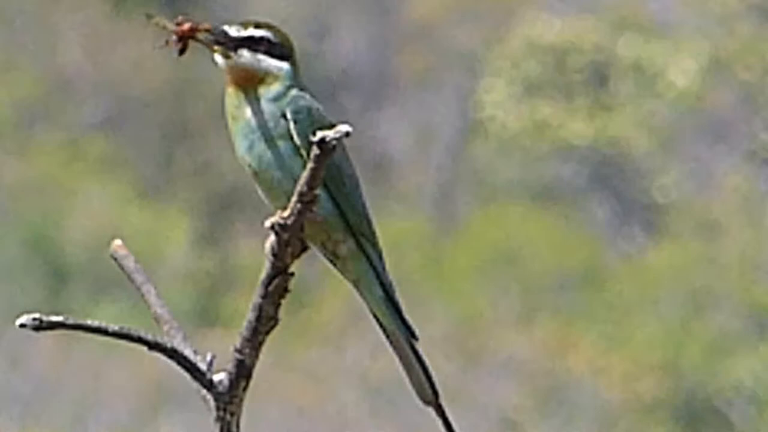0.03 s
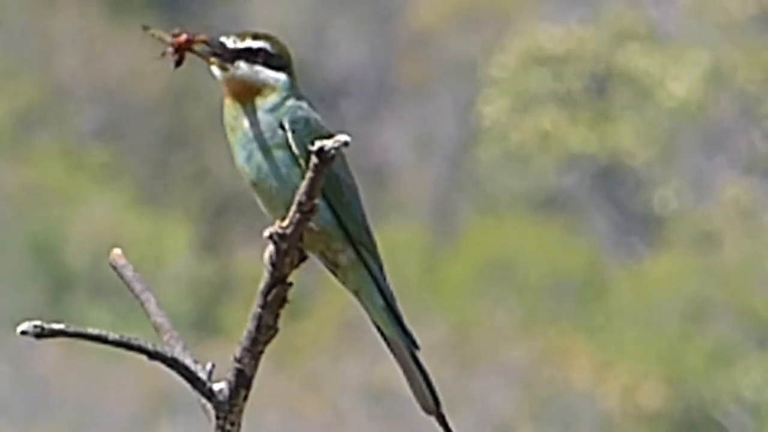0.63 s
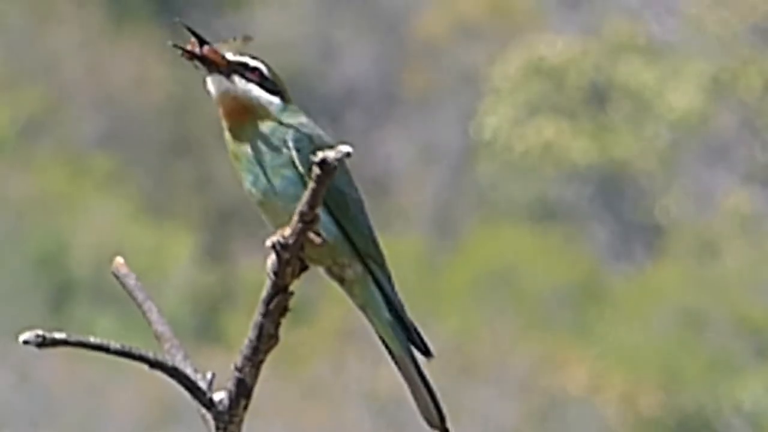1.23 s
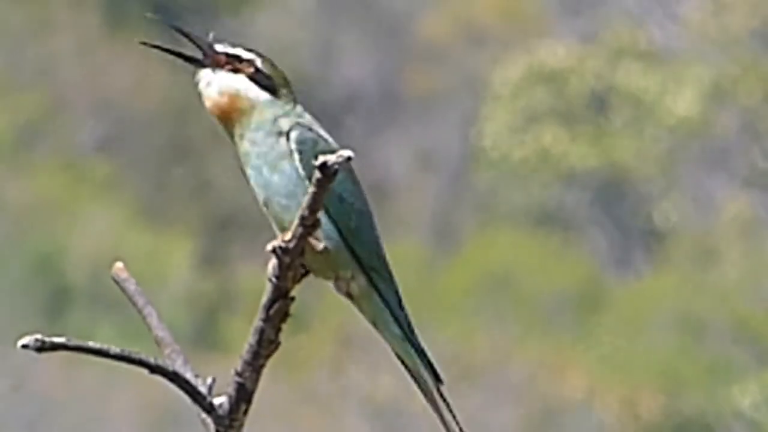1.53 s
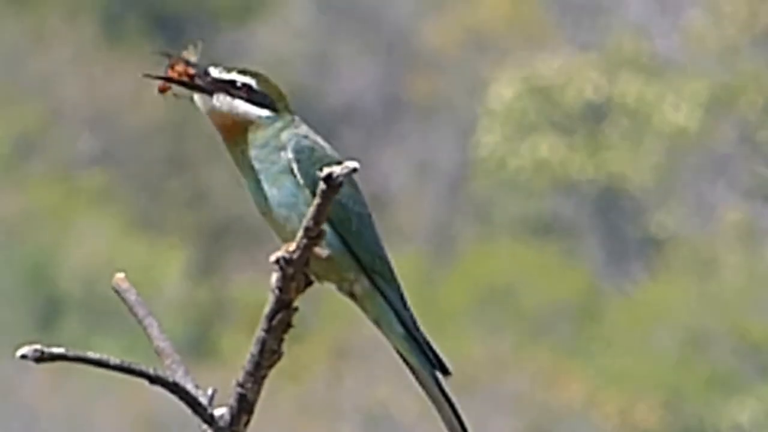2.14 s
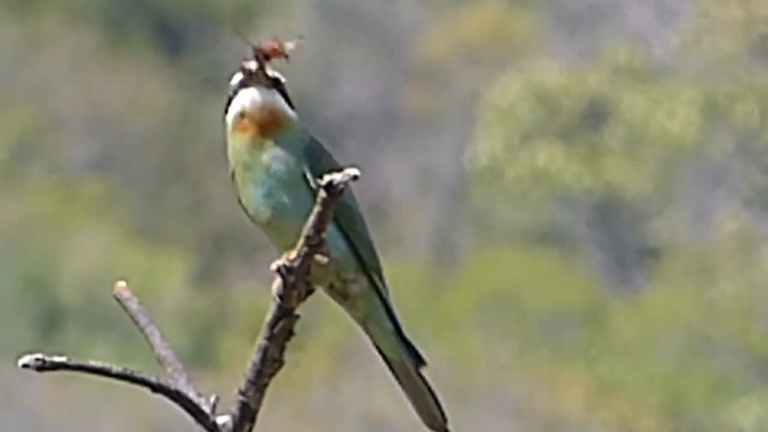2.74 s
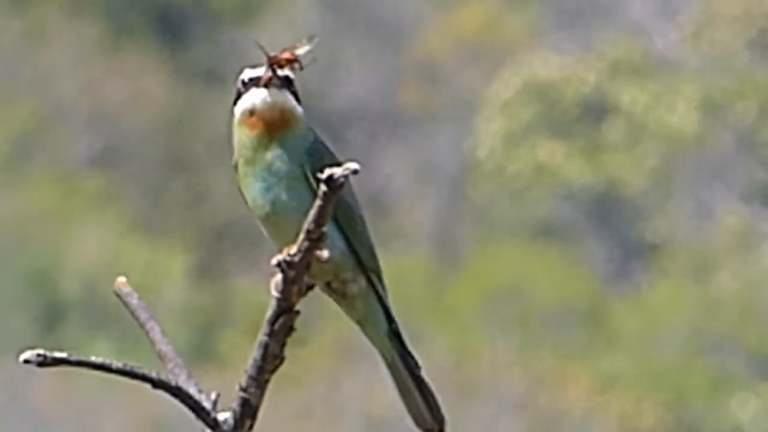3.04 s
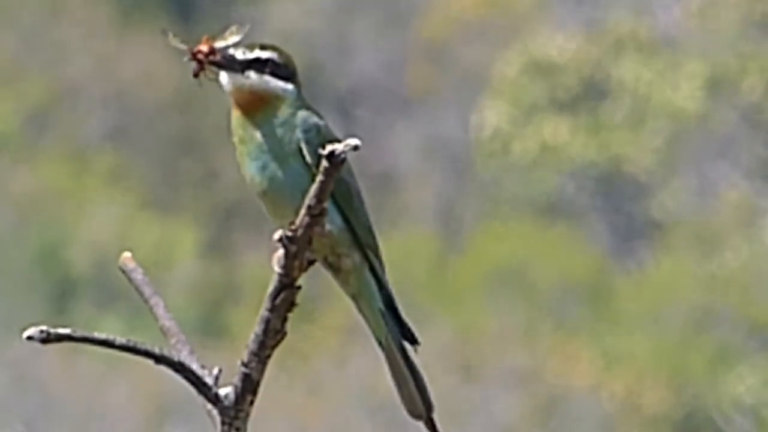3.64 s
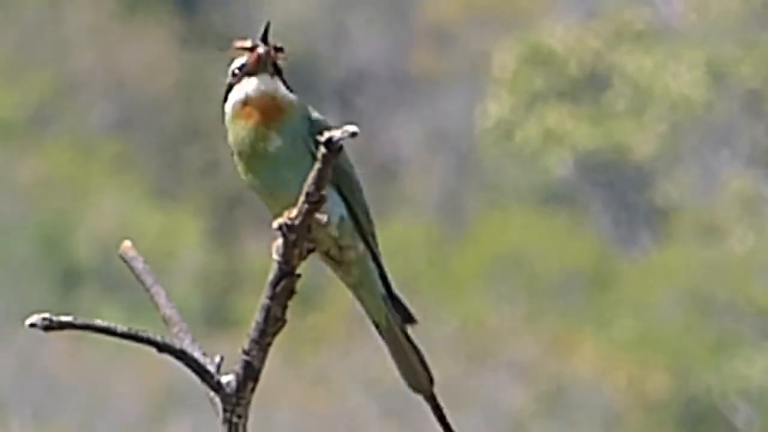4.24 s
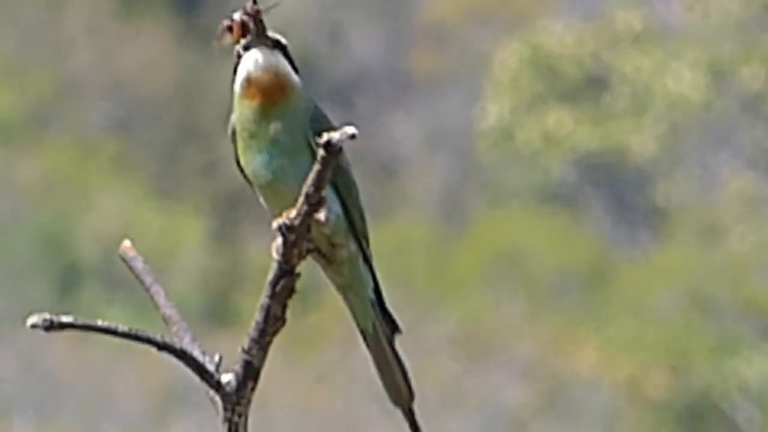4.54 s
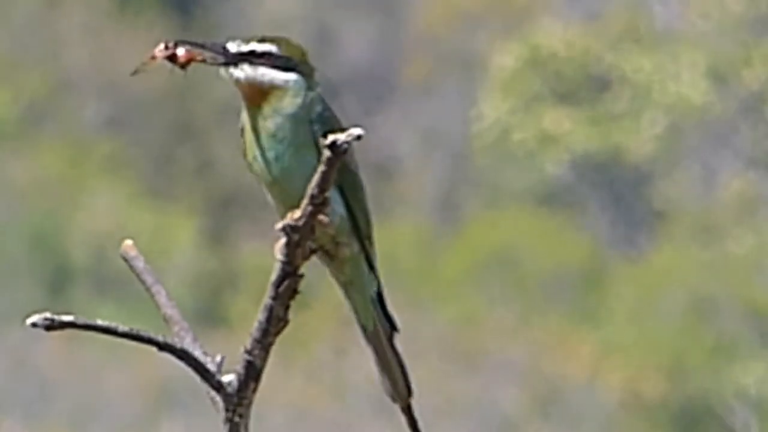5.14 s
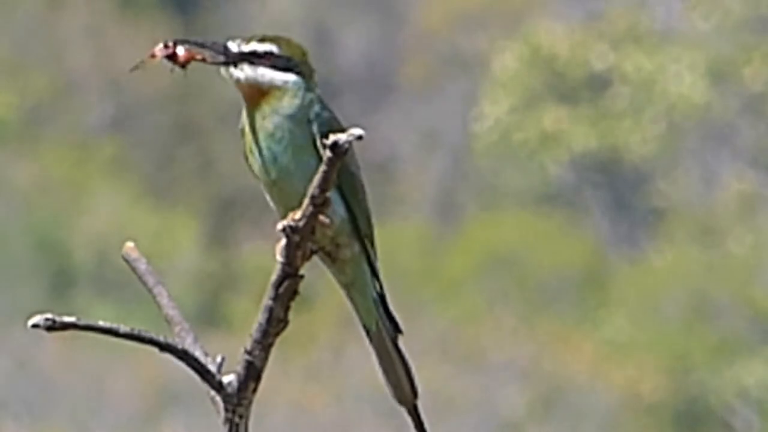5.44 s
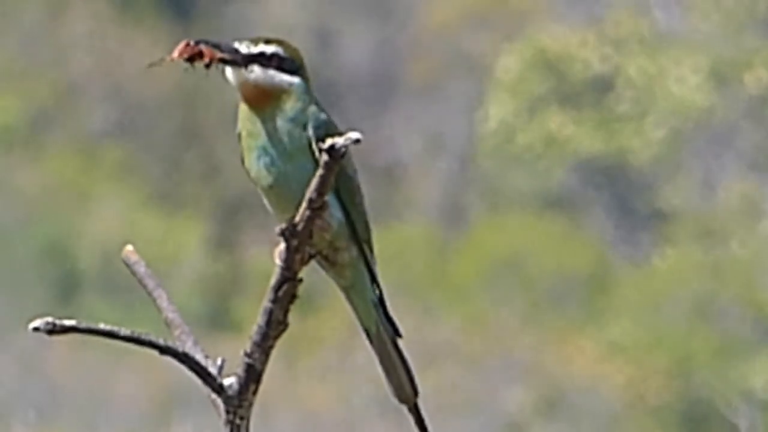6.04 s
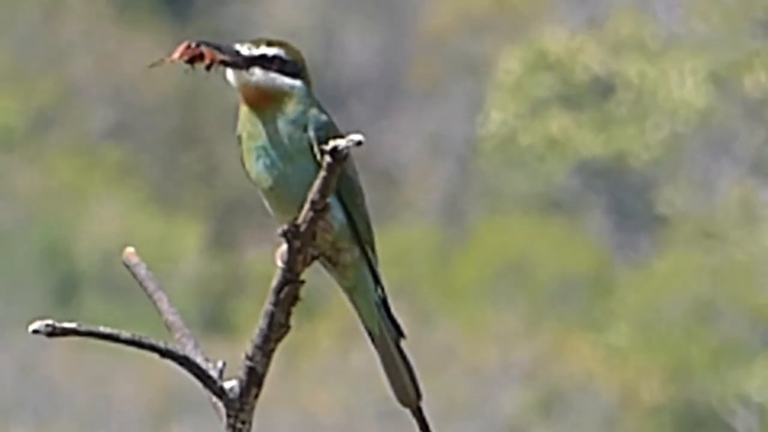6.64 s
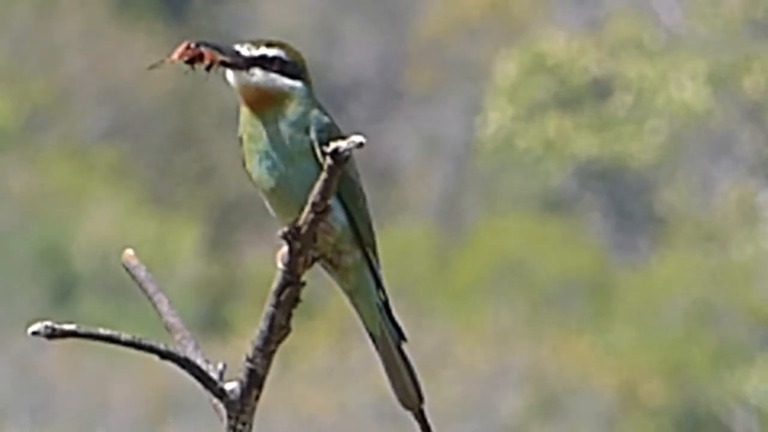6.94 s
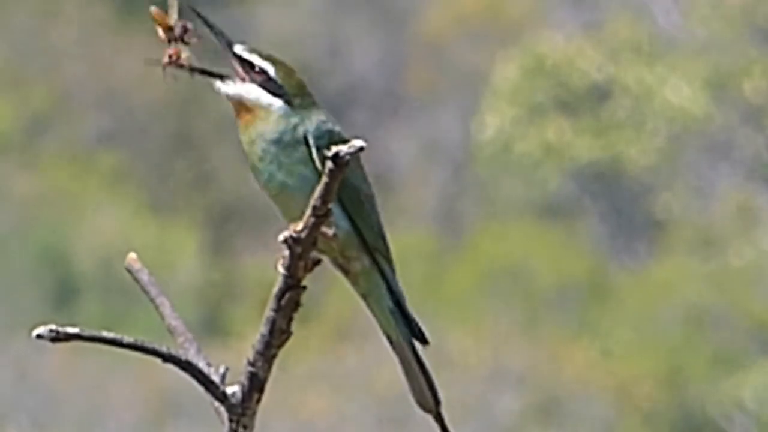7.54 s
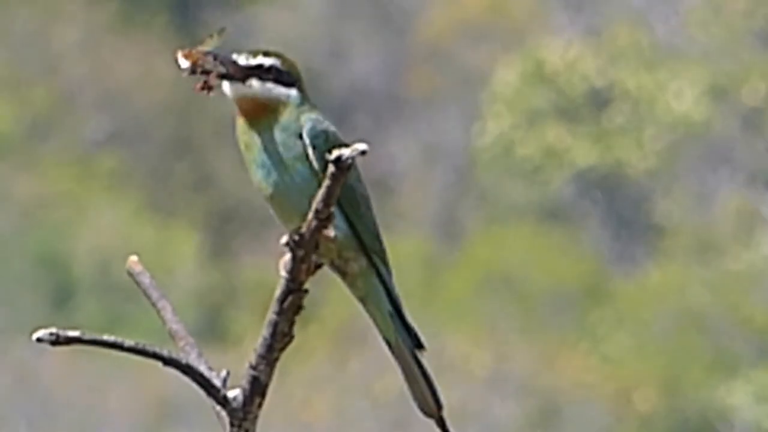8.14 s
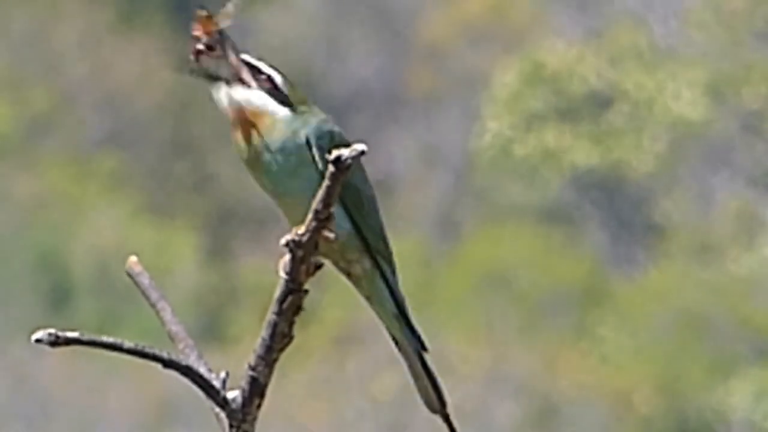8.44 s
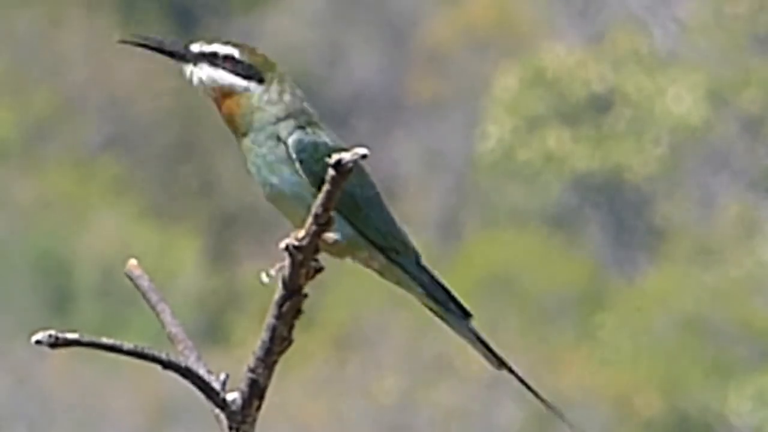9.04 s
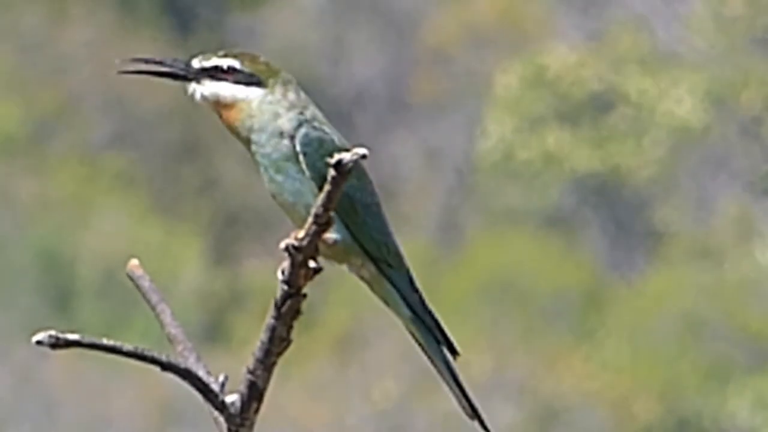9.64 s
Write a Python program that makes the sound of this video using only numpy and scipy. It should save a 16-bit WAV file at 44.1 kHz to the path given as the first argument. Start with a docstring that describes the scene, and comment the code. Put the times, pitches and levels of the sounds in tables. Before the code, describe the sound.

Outdoors in the scrub, a continuous shrill chorus of far cicadas mixes with the fast, high ticking of another insect. Midway a close cicada starts thinly and grows into a bright buzz that swells and dips to the end, with a short high rasp as it builds. Underneath, barely audible, come soft falling bird whistles, scattered dry taps, dull bumps on the microphone and light moving air.

```python
"""Hot scrubland, microphone in the open. From the start far cicadas hiss, their tymbal clicks merging, and a
higher insect clicks out quick syllables above them. Far lower in level come soft bumps at the microphone, dry
knocks and a distant bird's falling notes, over a faint background rush and low rumble. From 4.2 s a near cicada
winds up, its buckling ribs ringing its hollow abdomen; at 5 s another high insect rasps briefly. By 5.8 s the
near one holds a surging buzz, later topped by a sizzle. A small scrape comes near the end."""
import sys
import numpy as np
from scipy import signal
from scipy.fft import rfft, irfft
from scipy.io import wavfile
from scipy.ndimage import uniform_filter1d, map_coordinates

SR = 44100
rng = np.random.default_rng(int(sys.argv[2]) if len(sys.argv) > 2 else 0)


def int16_out(signal):
    """Quantize to a 16-bit WAV file."""
    q = np.round(np.clip(np.atleast_2d(signal).T, -1, 1) * 32767)
    wavfile.write(sys.argv[1], SR, q.astype(np.int16))


N = 435708
TIME = np.arange(N) / SR
HZ = np.maximum(np.fft.rfftfreq(N, 1 / SR), 1)

# tymbal cycle rate in full song: t/s, f/Hz
CICADA_RATE = [(5.9, 164.3), (6.54, 164.4), (7.17, 163.8), (7.47, 162.8), (9.88, 163.7)]
# relative strength of each rib, in buckling order
CICADA_RIBS = [0.62, 1.0, 0.93, 0.71]
# resonances of abdomen and tymbal: f/Hz, width/Hz, level/dB
ABDOMEN = [(4020, 350, 0.45), (4630, 480, 2.5), (5170, 530, 1.5), (6010, 260, -5), (6610, 240, -18.5),
           (7500, 240, -16), (9400, 1600, -16)]
CICADA_START_S, INTO_SONG_S = 4.19, (5.3, 5.8)   # entry; span in which wind-up turns into full song

def near_cicada(slow_start_hz=13.1, speed_up_s=.57, rib_step=.2471, jitter=.00028, stumble=.00499,
                waver_db=1.5, stutter_db=2.0):
    """Close by: four tymbal ribs buckle in turn each cycle, and every click rings the hollow abdomen."""
    rate, = in_time(CICADA_RATE)
    until_song_s = np.maximum(INTO_SONG_S[1] - TIME, 0)
    rate = rate - slow_start_hz * (1 - np.exp(-(until_song_s / speed_up_s) ** 2))
    full_rate = np.median(rate[TIME > INTO_SONG_S[1]])
    winding = np.interp(TIME, INTO_SONG_S, [1, 0])
    level_db, brightness = cicada_effort(winding)
    # winding up, the muscle stumbles and the ribs click evenly; in full song they bunch slightly
    cycle = np.cumsum(full_rate * (1 + (jitter + stumble * winding) * drift(39.5))) / SR
    step = rib_step + winding * (1 / len(CICADA_RIBS) - rib_step)
    clicks = 0
    for rib, strength in enumerate(CICADA_RIBS):
        samples_off = ((cycle - rib * step + .5) % 1 - .5) * SR / full_rate
        clicks += strength * np.sinc(samples_off) * (np.abs(samples_off) < 8)
    clicks *= 1 + .04 * drift(300)
    song = 0
    for k, (hz, width, db) in enumerate(ABDOMEN):
        tilt_db = brightness * min(hz / 1000 - 5, 1)   # pivots at 5 kHz, flat above 6 kHz
        # moving air makes each resonance swell and fade on its own
        song += (-1) ** k * from_db(db + tilt_db + waver_db * drift(6)) * resonate(clicks, hz, width)
    # a slack body runs slow: clicks and resonances glide together
    position = np.cumsum(rate / full_rate)
    song = map_coordinates(song, [position - position[-1] + N - 1], order=5, mode="mirror")
    song = bandpass(song, 3650, 10800, order=12)
    song /= np.sqrt(uniform_filter1d(song ** 2, size=4000))   # evens out the level
    fade_in = np.clip((TIME - CICADA_START_S) / .2, 0, 1)
    stutter = from_db(stutter_db * winding * (drift(16) - .5))
    return scrub(swell_partials(song) * from_db(level_db) * fade_in * stutter, t60=.087, wet_db=-15.5)


# surges of the near song: top t/s, length/s, extra level/dB, extra brightness/(dB/kHz)
SURGES = [(5.1, .5, 2.5, -1.2), (5.56, .24, -4, 0.5), (5.925, 0.24, 3, -0.5), (6.193, 0.25, 0.9, -6.5),
          (6.624, 0.49, 5.5, -4), (7.0, .2, 1.5, 3.5), (7.35, .15, -1, 1), (7.65, 0.61, 3, -0.5),
          (8.146, 0.3, 3.5, 1.5), (8.486, 0.43, 5, 2), (9.05, 0.33, -0.3, 0), (9.72, 0.71, 4.5, 1)]

def cicada_effort(winding, song_db=-34.5, faint_db=-12.5, grow_s=.56, thin_tilt=4.5, song_tilt=1.55):
    """Level/dB and brightness/(dB/kHz) of the near cicada: a thin, growing entry, then surges."""
    level_db = song_db + faint_db * np.exp(-np.maximum(TIME - CICADA_START_S, 0) / grow_s)
    brightness = song_tilt + winding * (thin_tilt - song_tilt)
    for s, length_s, db, brighter in SURGES:
        surge = swell(s, length_s)
        level_db += db * surge
        brightness += brighter * surge
    return level_db, brightness


# swells and dips of single partials: top t/s, length/s, f/Hz, extra level/dB
PARTIAL_SWELLS = [(6.08, 0.26, 4105, 4.5), (6.18, .15, 5260, -10), (6.6, 1.1, 5420, -7),
                  (6.65, .35, 4770, 4), (6.75, .5, 5940, 4.5), (6.92, .25, 5250, 3.5), (7.08, .25, 4095, 5),
                  (7.304, 0.14, 5225, 6.5), (7.55, .6, 5920, -3.5), (7.5, .18, 4560, 4),
                  (7.78, 0.59, 5375, 6.5), (7.8, .6, 6515, 6), (7.86, .2, 5210, -9),
                  (8.05, 0.39, 4565, 4.5), (8.42, .3, 5220, 5), (8.9, .35, 4620, -9), (8.94, .25, 4085, 8),
                  (8.95, .7, 3900, -3.5), (9.4, .6, 5250, 4), (9.55, 0.89, 4090, 5)]

def swell_partials(song, reach_hz=115):
    """One partial after another stands out of the near buzz or sinks back into it."""
    spectrum, out = rfft(song), song
    for s, length_s, hz, db in PARTIAL_SWELLS:
        band = np.exp(-np.minimum(((HZ - hz) / reach_hz) ** 2, 20))
        partial = irfft(spectrum * band, N)
        out = out + (from_db(db * swell(s, length_s)) - 1) * partial
    return out


# late rise of the sizzle: t/s, level/dB
SIZZLE_LEVEL = [(5.5, -78), (7.1, -62), (7.6, -54), (8.8, -57), (9.7, -52)]
# its spectrum: f/Hz, level/dB
SIZZLE_SPECTRUM = [(8000, -100), (11000, -25), (12400, -2), (13000, -4), (13450, -1), (13800, -15),
                   (14250, -16), (14700, -35)]

def sizzle(flutter_db=1.5):
    """The very top of the near cicada's song: its clicks smear into a fine sizzle."""
    level_db, = in_time(SIZZLE_LEVEL)
    return from_db(level_db + flutter_db * drift(8)) * spread(swarm(12000), SIZZLE_SPECTRUM)


# far chorus at the microphone: t/s, level/dB
CHORUS_LEVEL = [(0, -32), (1.2, -31.8), (2.1, -31), (3.2, -32.5), (4.8, -32), (7, -32.5), (9.88, -32)]
# its spectrum: f/Hz, level/dB
CHORUS_SPECTRUM = [(2500, -49), (3050, -38), (3300, -19), (3620, -13), (3880, -5), (4130, 1.5),
                   (4450, -1.5), (4950, -0.5), (5600, -10.5), (6300, -16.5), (7100, -23.5), (9400, -41),
                   (15000, -100)]

def far_chorus(flutter_db=.3):
    """Cicadas far out in the scrub: their clicks merge into one restless band of hiss."""
    level_db, = in_time(CHORUS_LEVEL)
    gain = from_db(level_db + flutter_db * drift(25))
    return gain * spread(patchy(swarm(30000), depth_db=1.03), CHORUS_SPECTRUM)


# swells of the high pulsing insect: top t/s, extra level/dB
SHRILL_SWELLS = [(.85, 2), (2.2, 2.5), (6.0, 2.5), (9.75, 3)]
# its spectrum: f/Hz, level/dB
SHRILL_SPECTRUM = [(6800, -47), (8000, -8.5), (8800, -1.5), (9620, -1.5), (9760, -8), (10000, 0),
                   (10225, 4.5), (10370, 0), (10600, -0.5), (11200, -10.5), (12200, -28), (14100, -53)]

def shrill_insect(usual_db=-34.5, wander_db=.6, syllables_per_s=22.6, cycles_per_syllable=9,
                  tempo_wander=.006, pause_depth=.69, pause_share=.25, smear=.7):
    """High tymbal clicks, partly smeared by the bushes, cut into syllables by brief pauses."""
    swells_db = sum(db * swell(s, length_s=.3) for s, db in SHRILL_SWELLS)
    level_db = usual_db + wander_db * drift(8.2) + swells_db
    syllable = np.cumsum(syllables_per_s * (1 + tempo_wander * drift(2))) / SR
    from_pause = 2 * ((syllable - .11) % 1) - 1   # zero just after the middle of each syllable
    gate = 1 - pause_depth / (1 + np.abs(from_pause / pause_share) ** 4.6)
    clicks = rms_one(high_tymbal(syllable * cycles_per_syllable) + smear * rng.standard_normal(N))
    return from_db(level_db) * rms_one(gate) * spread(patchy(clicks, depth_db=1.0), SHRILL_SPECTRUM)


# spectrum of the second high insect: f/Hz, level/dB
RASP_SPECTRUM = [(7400, -42), (8000, -5), (8350, 0.5), (8800, -12), (9300, 1), (9800, -5), (10300, -19),
                 (11600, -11), (12400, -33), (15000, -70)]

def rasping_insect(start_s=5.01, attack_s=.27, hold_s=.71, release_s=.4, level_db=-30.5,
                   sag_db_per_s=7.5, cycle_hz=212, tempo_wander=.025, smear=.55):
    """Another high insect joins with one short, unbroken run of tymbal clicks that sags in level."""
    age = np.maximum(TIME - start_s, 0)
    envelope = np.interp(age, np.cumsum([0, attack_s, hold_s, release_s]), [0, 1, 1, 0])
    cycle = np.cumsum(cycle_hz * (1 + tempo_wander * drift(20))) / SR
    clicks = rms_one(high_tymbal(cycle) + smear * rng.standard_normal(N))
    return envelope * from_db(level_db - sag_db_per_s * age) * spread(clicks, RASP_SPECTRUM)


# relative strength of each rib of the two high insects, in buckling order
HIGH_RIBS = [1, 1, 0.82, 0.59]

def high_tymbal(cycle, scatter_s=.00007, uneven_db=1.2):
    """The ribs buckle in turn in every cycle, each click a little off in time and strength."""
    due = np.flatnonzero(np.diff(np.floor(cycle * len(HIGH_RIBS))) > 0)
    late, strong = rng.standard_normal((2, N))[:, due]
    at = np.clip(due + np.round(late * scatter_s * SR).astype(int), 0, N - 1)
    clicks = np.zeros(N)
    clicks[at] = np.resize(HIGH_RIBS, len(due)) * from_db(uneven_db * strong)
    return rms_one(clicks)


# spectrum of the far high insects: f/Hz, level/dB
HAZE_SPECTRUM = [(5500, -49), (7100, -19), (7600, -7.5), (7950, 0.5), (9000, -3), (10500, -1.5),
                 (11650, -8.5), (11950, -16), (13500, -27.5), (14100, -46)]

def insect_haze(level_db=-36.5):
    """High insects far from the microphone merge into an even hiss."""
    return from_db(level_db) * spread(rng.standard_normal(N), HAZE_SPECTRUM)


# the bird's notes: t/s, top f/Hz, relative level/dB
BIRD_NOTES = [(1.21, 1080, -49), (1.446, 1105, -51), (1.71, 1130, -44), (1.974, 1030, -47),
              (4.725, 1095, -54), (4.945, 1070, -53), (7.62, 1118, -48.5), (7.862, 1085, -45),
              (8.124, 1100, -41.5), (9.125, 1012, -51), (9.345, 1097, -53.5), (9.565, 1120, -52)]

def distant_bird(length_s=.082, fall=.8, crest=.274, rough=.29, hoarse=.017, gain_db=-2.0):
    """Soft, hoarse whistles from across the scrub arch over their top pitch, then drop."""
    notes, length = np.zeros(N), int(length_s * SR)
    progress = np.arange(length) / length
    envelope = np.sin(np.pi * progress ** .76)
    quaver = 1 + hoarse * drift(120)
    for s, hz, db in BIRD_NOTES:
        span = slice(int(s * SR), int(s * SR) + length)
        pitch = hz * (1 - fall * (progress - crest) ** 2) * quaver[span]
        notes[span] += from_db(db + gain_db) * envelope * np.sin(2 * np.pi * np.cumsum(pitch) / SR)
    return scrub(notes * (1 + rough * drift(150)), t60=.99, wet_db=-2.5)


# dry knocks: t/s, relative level/dB, lowest f/Hz, highest f/Hz, t60/s
KNOCKS = [(1.114, -36.5, 1300, 2150, .028), (1.762, -42.5, 150, 1000, 0.044),
          (2.126, -44.5, 1500, 2300, 0.081), (2.86, -41, 1600, 3300, .035), (3.565, -47, 2820, 3220, 0.13),
          (5.451, -32.5, 250, 1900, 0.026), (9.29, -49, 2110, 2620, 0.079)]

def knocks(gain_db=1.0):
    """Short dry taps among the bushes, each filling its own band; the first, just before the bird's first note,
    is a snap of its beak."""
    taps = 0
    for s, db, low_hz, high_hz, t60 in KNOCKS:
        tap = bandpass(burst(s, t60) + 1e-18, low_hz, high_hz, order=4)
        taps += from_db(db + gain_db) * tap / np.abs(tap).max()
    return scrub(taps, t60=.12, wet_db=-8)


# spectrum of the scrape: f/Hz, level/dB
SCRAPE_SPECTRUM = [(200, -25), (420, -2.5), (1000, -12), (1500, 1), (2050, 0), (2800, -7), (4500, -55)]

def scrape(top_s=9.647, length_s=.04, level_db=-48.5):
    """A short rub of dry grains that swells and fades."""
    return from_db(level_db) * swell(top_s, length_s) * spread(swarm(3000), SCRAPE_SPECTRUM)


# soft bumps at the microphone: t/s, relative level/dB
BUMPS = [(0.229, -49.5), (0.519, -52), (1.763, -54), (3.718, -54), (4.363, -55), (4.449, -49), (5.287, -45),
         (5.377, -51), (5.449, -45), (5.529, -53), (5.69, -52), (7.124, -55), (7.453, -54)]

def microphone_bumps(body_hz=150, width_hz=120, gain_db=1.5, rub_db=-81, rub_swing_db=5, side_db=-6):
    """Dull thuds right at the microphone, faint uneven rubbing between; partly unlike left and right."""
    def handling():
        push = sum(from_db(db + gain_db) * burst(s, t60=.25) for s, db in BUMPS)
        body = resonate(push, body_hz, width_hz)
        thuds = resonate(body, body_hz, 2 * width_hz) * np.sqrt(SR / width_hz) / 4
        rubbing = resonate(resonate(rng.standard_normal(N), hz=197, width=64), hz=197, width=64)
        return thuds + from_db(rub_db) * rms_one(rubbing * from_db(rub_swing_db * drift(5.4)))
    mid, side = handling(), from_db(side_db) * handling()
    return np.array([mid + side, mid - side])


# spectrum of the faint background rush and low rumble: f/Hz, level/dB
RUSH_SPECTRUM = [(12, -7.5), (22, -4), (32, -18), (56, -25.5), (125, -51), (190, -19), (269, -17),
                 (400, -15.5), (464, -9.5), (600, -15), (960, -7.5), (1150, -20), (1400, -13.5),
                 (2600, -19.5), (3100, -21.5), (6600, -100)]

def background_rush(level_db=-57, sway_db=1.55):
    """Faint background rush and low rumble."""
    return from_db(level_db + sway_db * drift(6.4)) * spread(rng.standard_normal(N), RUSH_SPECTRUM)


def patchy(x, depth_db, band_hz=130, count=14):
    """Moving air lets narrow bands of a far sound swell and fade, in `count` interleaved sets."""
    spectrum, out = rfft(x), 0
    for k in range(count):
        bands_off = np.abs((HZ / band_hz - k + count / 2) % count - count / 2)
        bands = irfft(spectrum * np.maximum(1 - bands_off, 0), N)
        out += bands * from_db(depth_db * drift(3.6))
    return out


def scrub(x, t60, wet_db):
    """Direct sound plus scatter from the bushes, different on each side of the microphone."""
    tails = rng.standard_normal((2, SR)) * from_db(-60 * TIME[:SR] / t60)
    tails /= np.sqrt(np.sum(tails ** 2, axis=1, keepdims=True))
    return x + from_db(wet_db) * signal.fftconvolve([x], tails, axes=1)[:, :N]


# stereo width at the microphone: f/Hz, side minus mid level/dB
STEREO_WIDTH = [(30, -2), (120, -8), (350, -5.5), (700, -4.5), (1300, -15), (2500, -12), (4200, -19),
                (8000, -13.5), (10500, -15), (13000, -12)]

def spread(excitation, spectrum):
    """Colour a source and surround it with its own diffuse scatter; stereo, rms 1."""
    colour = gain_at(spectrum)
    mid = irfft(rfft(excitation) * colour, N)
    side = irfft(rfft(rng.standard_normal(N)) * colour * gain_at(STEREO_WIDTH), N)
    return rms_one(np.array([mid + side, mid - side]))


def swarm(clicks_per_s):
    """Countless unrelated tiny clicks."""
    return rms_one((rng.random(N) < clicks_per_s / SR) * rng.standard_normal(N))


def burst(s, t60):
    """Noise that starts at s and dies away."""
    out, start = np.zeros(N + SR), int(s * SR)
    out[start:start + SR] = rng.standard_normal(SR) * from_db(-60 * np.minimum(TIME[:SR] / t60, 2))
    return out[:N]


def swell(s, length_s):
    """A smooth rise and fall around s, above half its height for length_s."""
    return np.exp2(-np.minimum((2 * (TIME - s) / length_s) ** 2, 20))


def drift(rate_hz):
    """Random wander, mostly slower than rate_hz; rms 1."""
    return rms_one(irfft(rfft(rng.standard_normal(N)) / (1 + (HZ / rate_hz) ** 2), N))


def resonate(x, hz, width):
    """One resonance, gain 1 on top."""
    r = np.exp(-np.pi * width / SR)
    feedback = [1, -2 * r * np.cos(2 * np.pi * hz / SR), r * r]
    return signal.lfilter(np.array([1, 0, -1]) * (1 - r * r) / 2, feedback, x + 1e-18)


def bandpass(x, low_hz, high_hz, order):
    """Keep one band."""
    return signal.sosfilt(signal.butter(order, [low_hz, high_hz], "band", fs=SR, output="sos"), x)


def gain_at(points):
    """Gain of an f/Hz, level/dB table at every frequency."""
    hz, db = np.transpose(points)
    return from_db(np.interp(np.log(HZ), np.log(hz), db))


def in_time(rows):
    """Each column of a curve at every sample."""
    s, *columns = np.transpose(rows)
    return [np.interp(TIME, s, c) for c in columns]


def from_db(db):
    """Decibels to gain."""
    return 10 ** (np.asarray(db) / 20)


def rms_one(x):
    """Scale to rms 1."""
    return x / np.sqrt(np.mean(x ** 2) + 1e-20)


def scene():
    """All sources at the microphone."""
    insects = far_chorus() + insect_haze() + shrill_insect() + rasping_insect() + near_cicada() + sizzle()
    return insects + distant_bird() + knocks() + scrape() + microphone_bumps() + background_rush()


def record(dry, start_s=.072, offset=-.0031, cutoff_hz=14700):
    """The sound switches on after a moment, sits on a small offset and loses its top."""
    lowpass = signal.ellip(10, .1, 80, cutoff_hz, fs=SR, output="sos")
    return signal.sosfilt(lowpass, (dry + offset) * (TIME >= start_s))


dry = scene()
out = record(dry)
int16_out(out)
```